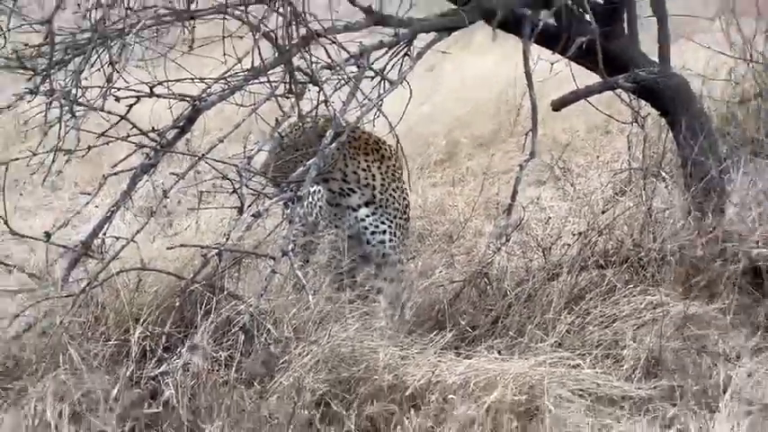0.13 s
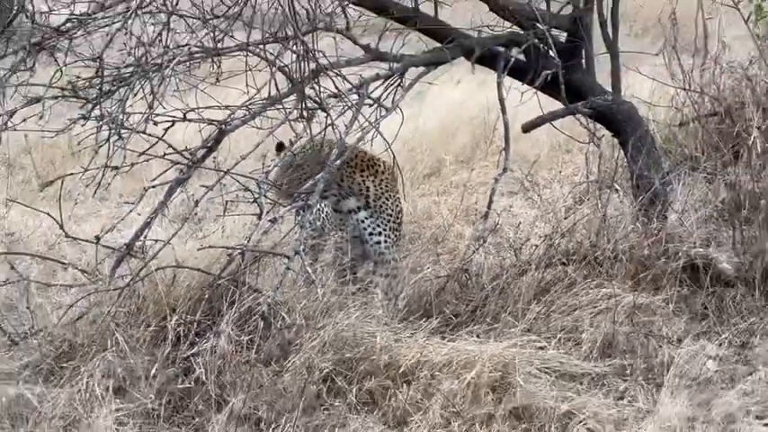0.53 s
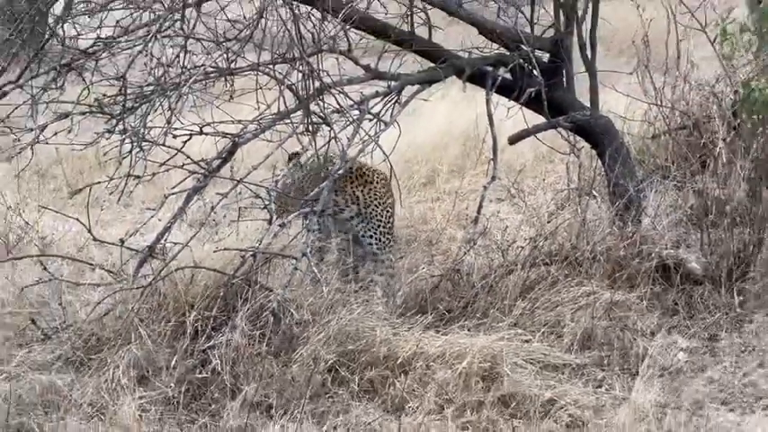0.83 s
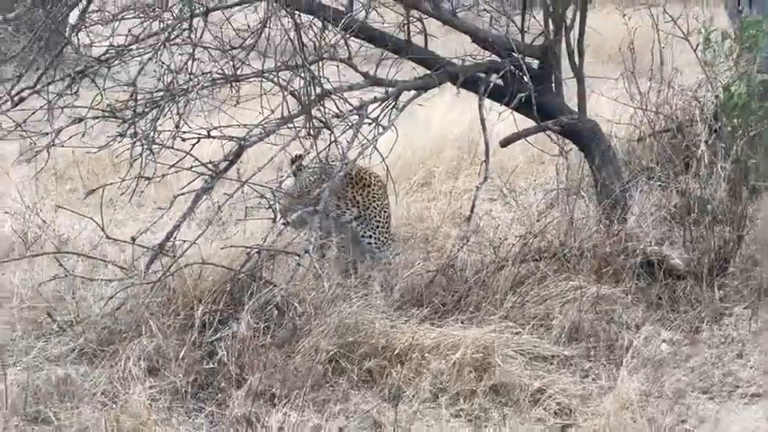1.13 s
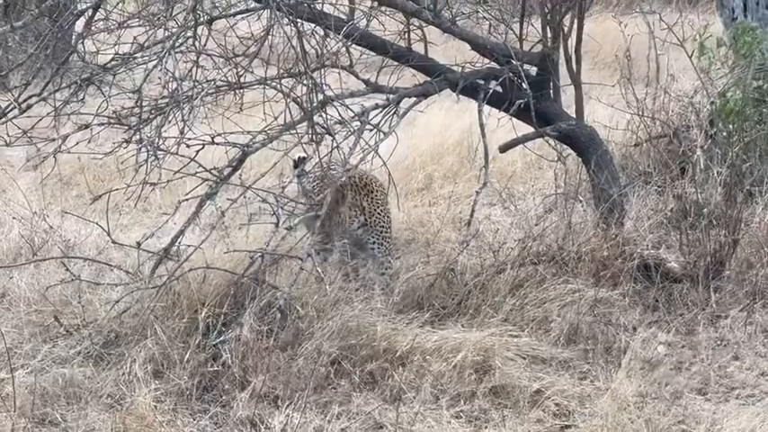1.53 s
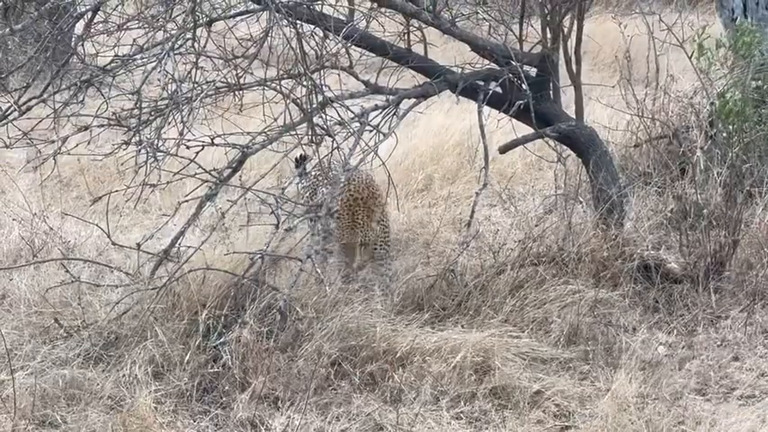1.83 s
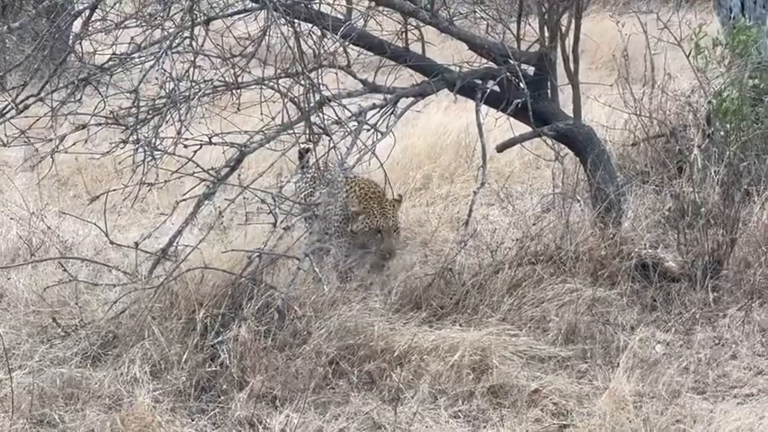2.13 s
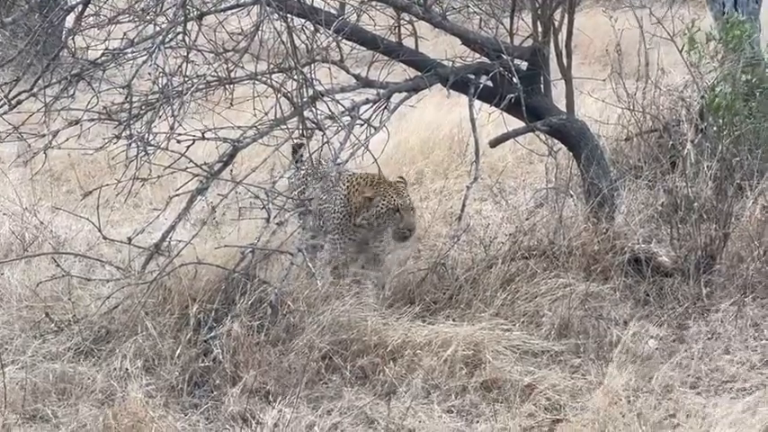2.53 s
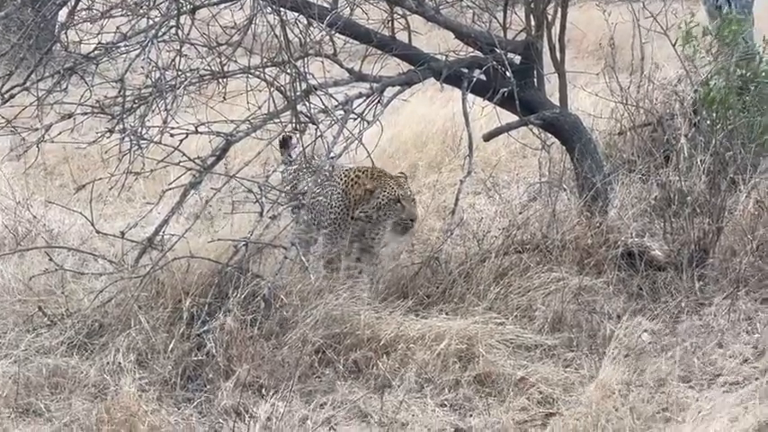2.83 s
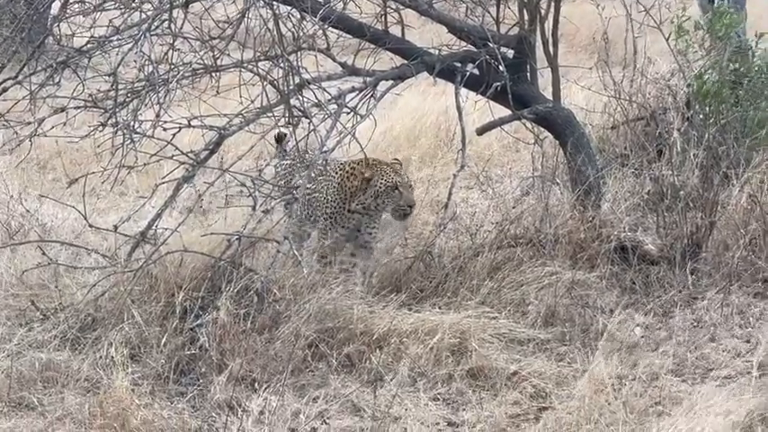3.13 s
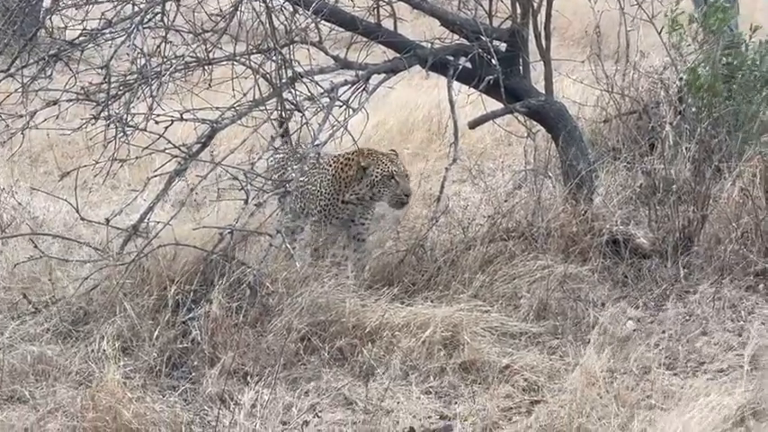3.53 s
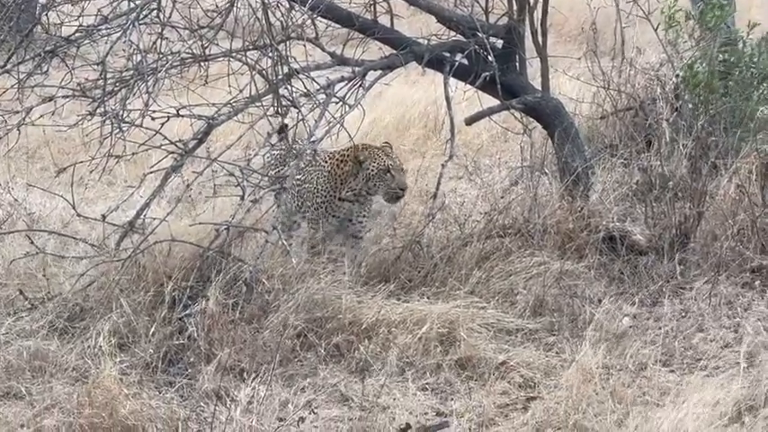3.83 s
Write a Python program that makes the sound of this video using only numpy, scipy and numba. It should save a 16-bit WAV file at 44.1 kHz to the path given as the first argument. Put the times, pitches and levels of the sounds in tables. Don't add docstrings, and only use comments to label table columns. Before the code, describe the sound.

A leopard's harsh rasping sawing calls in dry bush, then hard wind buffets the microphone

```python
import sys
import numpy as np
from scipy import signal
from scipy.fft import rfft, irfft
from scipy.io import wavfile
from numba import njit

SR = 44100
rng = np.random.default_rng(int(sys.argv[2]) if len(sys.argv) > 2 else 0)


def bounce(signal):
    frames = np.transpose(np.atleast_2d(signal))
    limited = np.clip(frames, -1, 1)
    pcm = np.round(limited * 32767).astype(np.int16)
    wavfile.write(sys.argv[1], SR, pcm)


def nominal_scale(level):
    x = np.asarray(level, float) / 20
    return 10 ** x


N = 176400
T = np.arange(N) / SR
SIDES = np.array([[1], [-1]])

# [f/Hz, width/Hz, level/dB]
OUTWARD_THROAT = [(685, 127, -4), (869, 250, -5), (1011.6, 59, -4), (1138, 57, -7), (1512, 76, -8),
                  (1731, 77, -13.5), (1984, 72, -14), (2205, 50, -23), (2466, 280, -18.5), (2940, 120, -28)]


def rms_one(x):
    return x / np.sqrt(np.mean(x ** 2) + 1e-20)


def even(x, on):
    return x / np.sqrt(np.mean(x[on] ** 2) + 1e-20)


def butter(x, hz, kind, order=2):
    return signal.sosfilt(signal.butter(order, hz, kind, fs=SR, output="sos"), x)


def drift(rate_hz):
    r = np.exp(-80 * np.pi * rate_hz / SR)
    slow = signal.lfilter([1], [1, -2 * r, r * r], rng.standard_normal(N // 40 + 2002))[2000:]
    return np.interp(np.arange(N) / 40, np.arange(len(slow)), rms_one(slow))


@njit
def glide(x, a1, a2):
    y = np.zeros(len(x))
    for i in range(2, len(x)):
        y[i] = x[i] - x[i - 2] + a1[i] * y[i - 1] - a2 * y[i - 2]
    return y


def resonance(x, hz, width_hz):
    r = np.exp(-np.pi * width_hz / SR)
    a1 = 2 * r * np.cos(2 * np.pi * hz / SR) * np.ones(N)
    return glide(x + 1e-18, a1, r * r) * (1 - r * r) / 2


def double_resonance(x, hz, width_hz):
    return resonance(resonance(x, hz, width_hz), hz, 2 * width_hz)


def coloured(spectrum, white):
    hz, db = np.transpose(spectrum)
    f = np.maximum(np.arange(N // 2 + 1) * SR / N, 1)
    gain = nominal_scale(np.interp(np.log(f), np.log(hz), db, left=-99, right=-99))
    return rms_one(irfft(rfft(white) * gain, N))


def bush():
    # [f/Hz, level/dB]
    foliage = [(88, -17.5), (150, -3), (624, 0), (1180, -1.5), (1980, -4), (4630, -20), (8250, -22.5),
               (10800, -31), (15000, -26.5)]
    mid, side = [coloured(foliage, white) for white in rng.standard_normal((2, N))]
    return nominal_scale(-59.5 + drift(0.67)) * (mid + nominal_scale(-8) * side * SIDES)


def reed():
    hiss = rms_one(butter(rng.standard_normal(N), [9400, 9700], "band"))
    return nominal_scale(-75 + 3 * drift(15)) * hiss * (T > 3.57)


def whistle():
    # [t/s, f/Hz, level/dB]
    tone = [
        (3.118, 300, -72),
        (3.251, 374.5, -47),
        (3.37, 394.7, -35.5),
        (3.429, 520.4, -36),
        (3.458, 543, -58),
    ]
    s, hz, db = np.transpose(tone)
    level = nominal_scale(np.interp(T, s, db, left=-120, right=-120) + 0.86 * drift(30))
    return np.sqrt(2) * level * np.sin(2 * np.pi * np.cumsum(np.interp(T, s, hz)) / SR)


def wind():
    # [t/s, level/dB]
    breeze = [
        (0, -40),
        (.1, -59),
        (.7, -46.5),
        (.92, -46),
        (1.6, -35.5),
        (1.9, -42),
        (2.64, -32),
        (2.95, -46),
        (3.4, -32.5),
    ]
    # [t/s, level/dB]
    gust = [
        (3.46, -32.5),
        (3.524, -16),
        (3.552, -30.5),
        (3.59, -13),
        (3.852, -12.5),
        (3.904, -25.5),
        (3.924, -8.5),
        (3.978, -22),
        (4.0, -11),
    ]
    # [t/s, peak level/dB]
    eddies = [(0.607, -35.5), (3.548, -57.5), (3.608, 3), (3.637, -17.5), (3.667, -5), (3.69, -33),
              (3.709, -43), (3.741, -10.5), (3.782, -14.5), (3.817, -1.5), (3.86, 1), (3.911, -6.5),
              (3.932, -18), (3.964, -3.5)]
    force_db = np.interp(T, *np.transpose(breeze + gust))
    speed = 2.3 * np.exp(0.3 * drift(30))
    swept_level = nominal_scale(force_db - 6.5 + 2.5 * drift(60))
    for s, db in eddies:
        bump = np.exp(-((T - s - 0.0046) / 0.0091) ** 2)
        speed = speed + 1.9 * bump
        swept_level = swept_level + nominal_scale(db - 11.5) * bump
    slow_level = nominal_scale(force_db + 3.5 + 2.5 * drift(18))
    place = np.minimum(np.cumsum(speed) + 4000, 4 * N - 1)
    air = butter(rng.standard_normal((4, 4 * N)), [45, 120.4], "band")
    air = butter(air, 240, "low")

    def pressure(fast, slow):
        swept = rms_one(np.interp(place, np.arange(4 * N), fast))
        return butter(swept_level * swept, 830, "low", order=4) + slow_level * rms_one(slow[N:2 * N])

    return pressure(air[0], air[2]) + nominal_scale(-12) * pressure(air[1], air[3]) * SIDES


def scatter(x):
    s = np.arange(SR // 4) / SR
    tail = rng.standard_normal((2, SR // 4)) * np.exp(-s / 0.03)
    tail /= np.sqrt(np.sum(tail ** 2, axis=1, keepdims=True))
    return nominal_scale(-10) * butter(signal.fftconvolve(x[None], tail, axes=1)[:, :N], 4500, "low")


def fold_pulses(rows, jitter, shimmer_db, slow):
    pulses = np.zeros(N)
    chances = np.clip(rng.standard_normal((len(rows), 2, 24)), -1.5, 1.5)
    for (s, length, _, rate, _), chance in zip(rows, chances):
        at = s
        for late, size in chance.T:
            if at < s + length:
                pulses[int(at * SR)] = nominal_scale(shimmer_db * size)
            slowing = 1 + slow * (2 * (at - s) / length - 1) ** 2
            at += slowing * np.exp(jitter * late) / rate
    return pulses


def articulation(rows, peak, start_db, end_db, opens, shuts, sag):
    effort, mouth, low_hz = np.zeros(N), np.zeros(N), np.full(N, 160.)
    for s, length, db, _, hz in rows:
        u = (T - s) / length
        edge = np.clip((T - s) / 0.012 + 1, 0, 1)
        edge = edge * np.exp(-np.maximum(T - s - length, 0) / 0.014)
        effort += edge * nominal_scale(db + np.interp(u, [0, peak, 1], [start_db, 0, end_db]))
        jaw_s = [0, opens / 3, opens, shuts, shuts + 0.17, shuts + 1]
        mouth += edge * nominal_scale(db + np.interp(u, jaw_s, [-24, -6, 0, -5, -14.5, -24.5]))
        near = (u > -.15) & (u < 1.3)
        bend = np.interp(u[near], [0, .3, .5, 1], [1 - sag * 0.97, .97, 1, 1 - sag])
        low_hz[near] = hz * bend
    return effort, mouth, low_hz


def chest_tone(pulses, low_hz, width_hz, on):
    soft = butter(pulses, 350, "low")
    ring = double_resonance(butter(soft, 419, "low", order=4), low_hz, width_hz)
    push = butter(soft, [50, 130], "band")
    return even(ring, on) + nominal_scale(-16) * even(push, on)


def throat_tone(pulses, gate, throat, rasp, on):
    noise = rng.standard_normal(N) * (gate + 0.18)
    source = (1 - rasp) * even(butter(pulses, 6000, "low"), on) + rasp * even(noise, on)
    upper = np.zeros(N)
    for k, (hz, width_hz, db) in enumerate(throat):
        mode = even(double_resonance(source, hz, width_hz), on)
        upper += (-1) ** k * nominal_scale(db + 3 * drift(8.6)) * mode
    return even(upper, on)


def mouth_hiss(gate, mouth):
    # [f/Hz, level/dB]
    jet = [(2300, 7.5), (2900, 0), (5300, -8.5), (7000, -12), (8900, -10.5), (10300, -17), (12500, -19),
           (15800, -21)]
    # [f/Hz, width/Hz, level/dB]
    cavities = [(3255, 210, -4.5), (4195, 70, 7.5), (4844, 160, 4.5), (5340, 160, 9), (5910, 190, 5),
                (6450, 140, 6), (8530, 640, 0.5)]
    air, wide = [coloured(jet, n * (gate + 0.5)) for n in rng.standard_normal((2, N))]
    hiss = air.copy()
    for hz, width_hz, db in cavities:
        hiss += nominal_scale(db + 3 * drift(10)) * resonance(air, hz, width_hz)
    side = butter(signal.hilbert(hiss).imag + .4 * wide, 5000, "high")
    side = butter(side[::-1], 4600, "high")[::-1]
    return (hiss + nominal_scale(-2) * side * SIDES) * (mouth / mouth.max()) ** 0.5


def strokes(rows, throat, peak, start_db, end_db, opens, shuts, jitter, shimmer_db, slow, sag,
            width_hz, mouth_db, hiss_db, rasp):
    pulses = fold_pulses(rows, jitter, shimmer_db, slow)
    effort, mouth, low_hz = articulation(rows, peak, start_db, end_db, opens, shuts, sag)
    on = effort > effort.max() / 8
    gate = signal.lfilter([1], [1, -np.exp(-1 / (0.005 * SR))], pulses)
    chest = chest_tone(pulses, low_hz, width_hz, on)
    upper = throat_tone(pulses, gate, throat, rasp, on)
    radiated = nominal_scale(mouth_db) * upper + nominal_scale(hiss_db) * mouth_hiss(gate, mouth)
    return effort * chest + mouth * radiated


def gasps():
    # [t/s, length/s, level/dB, pulse rate/Hz, top of lowest resonance f/Hz]
    breaths_in = [
        (.984, 0.11, -22.5, 45, 157.4),
        (1.419, 0.21, -28, 37.89, 154),
        (1.934, 0.22, -26.5, 33.43, 151.4),
        (2.451, .26, -24.5, 36.04, 139),
        (3.024, .24, -24.5, 32.17, 162),
    ]
    # [f/Hz, width/Hz, level/dB]
    inward_throat = [(344, 33, 1.5), (622, 56, -0.5), (940, 91, -1.5), (1103, 51, -4), (1408, 35, -10.5),
                     (1810, 360, -5.5), (1960, 90, -19), (2486, 330, -9.5)]
    return strokes(breaths_in, inward_throat, peak=0.77, start_db=-12, end_db=-5,
                   opens=0.91, shuts=0.94, jitter=.14, shimmer_db=2.5, slow=.15, sag=0.032,
                   width_hz=58, mouth_db=-17, hiss_db=-39, rasp=0.74)


def grunt():
    # [t/s, length/s, level/dB, pulse rate/Hz, top of lowest resonance f/Hz]
    opening = [
        (.674, .2, -22.5, 41.67, 164.7),
    ]
    return strokes(opening, OUTWARD_THROAT, peak=0.72, start_db=-15, end_db=-12,
                   opens=0.23, shuts=0.33, jitter=0.067, shimmer_db=3, slow=0.18, sag=0.12,
                   width_hz=36, mouth_db=-15, hiss_db=-38, rasp=0.84)


def saws():
    # [t/s, length/s, level/dB, pulse rate/Hz, top of lowest resonance f/Hz]
    breaths_out = [
        (1.143, 0.2, -11, 69, 244.4),
        (1.664, .21, -14.5, 64.7, 229),
        (2.188, 0.21, -11, 68.7, 239),
        (2.74, 0.22, -10.5, 60, 228.6),
        (3.291, .23, -12.5, 54, 215.3),
    ]
    return strokes(breaths_out, OUTWARD_THROAT, peak=0.2, start_db=-19.5, end_db=-11,
                   opens=0.35, shuts=0.83, jitter=.04, shimmer_db=1, slow=0.22, sag=0.27,
                   width_hz=48, mouth_db=-13.5, hiss_db=-35, rasp=0.5)


def scene():
    cat = saws() + grunt() + gasps()
    around = scatter(cat[0]) + wind() + whistle() + reed() + bush()
    return cat * nominal_scale(0.25 * SIDES) + around


def top_cut(x):
    return signal.sosfilt(signal.butter(12, 16550, fs=SR, output="sos"), x)


def record(dry):
    # [low f/Hz, high f/Hz]
    dead_bands = [(7250, 7550), (10350, 12300)]
    x = butter(dry, 46.9, "high", order=4)
    spectrum = rfft(0.95 * np.tanh(x / 0.95), 2 * N)
    f = np.arange(N + 1) * SR / (2 * N)
    dead = f > 15800
    for low, high in dead_bands:
        dead |= (f > low) & (f < high)
    mix = irfft(spectrum * np.where(dead, .03, 1), 2 * N)[:, :N]
    return top_cut(mix)


dry = scene()
out = record(dry)
bounce(out)
```